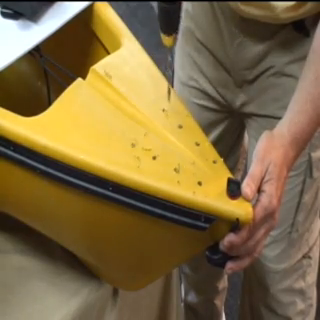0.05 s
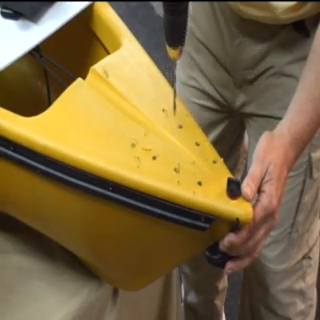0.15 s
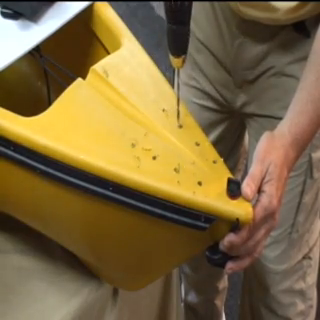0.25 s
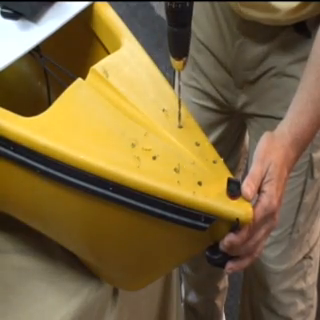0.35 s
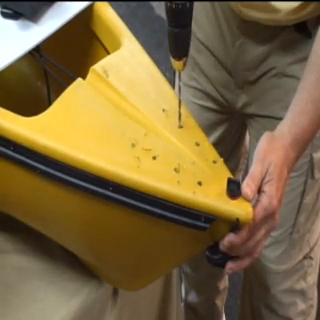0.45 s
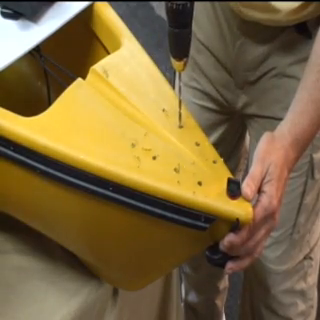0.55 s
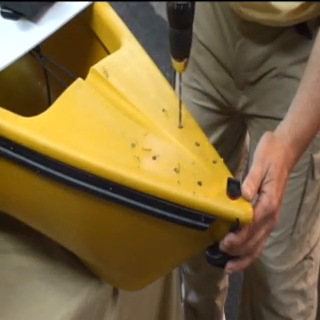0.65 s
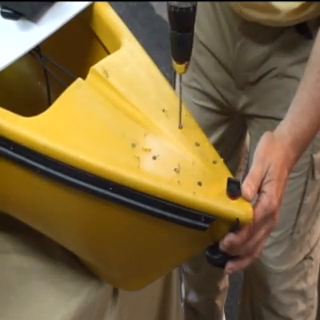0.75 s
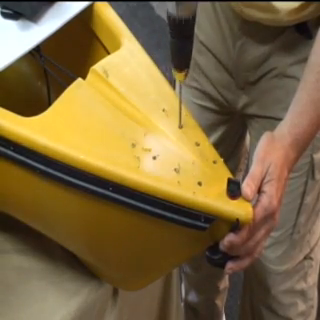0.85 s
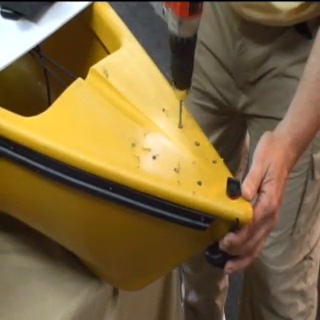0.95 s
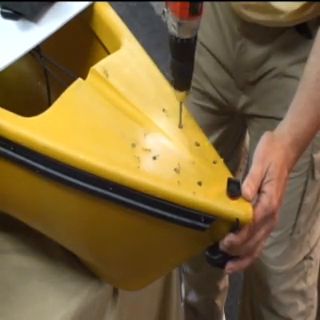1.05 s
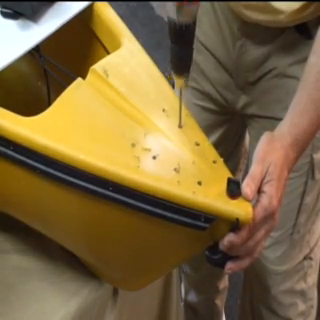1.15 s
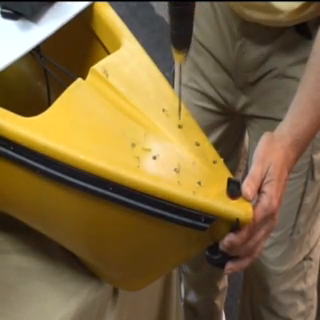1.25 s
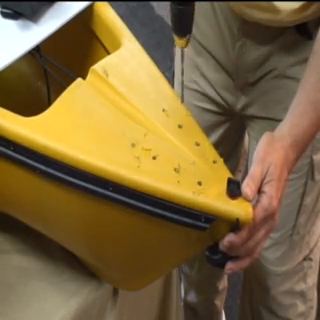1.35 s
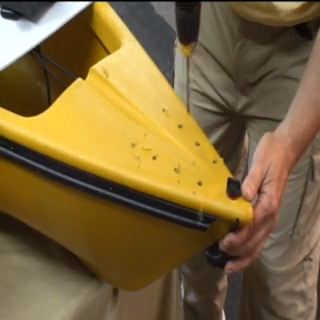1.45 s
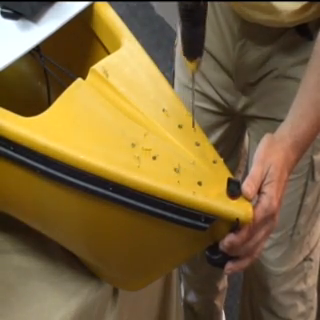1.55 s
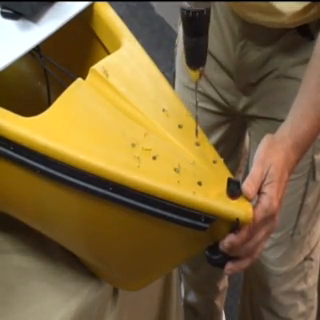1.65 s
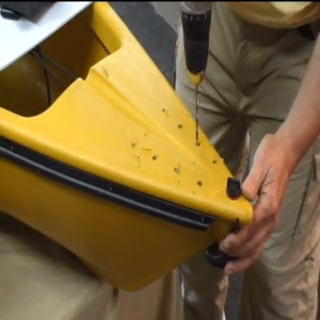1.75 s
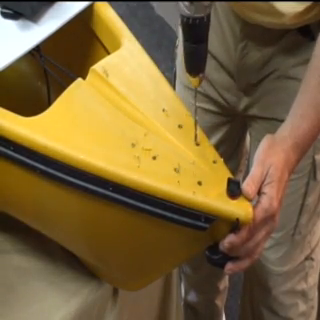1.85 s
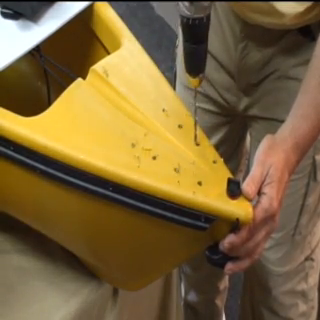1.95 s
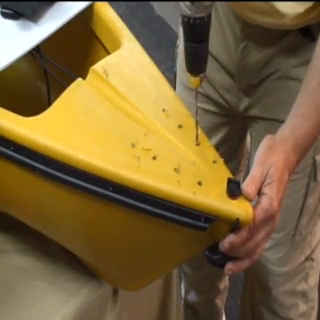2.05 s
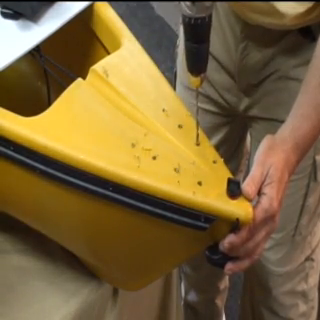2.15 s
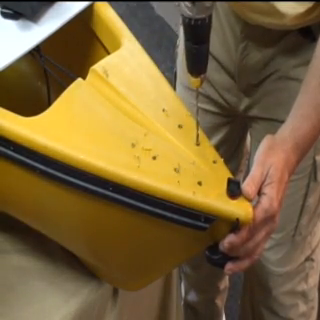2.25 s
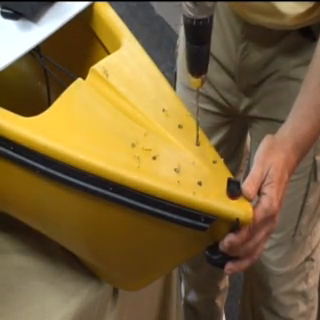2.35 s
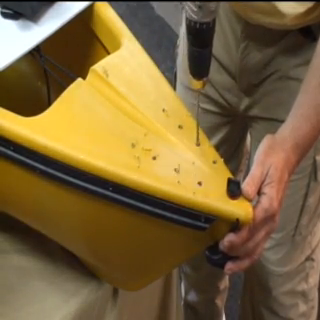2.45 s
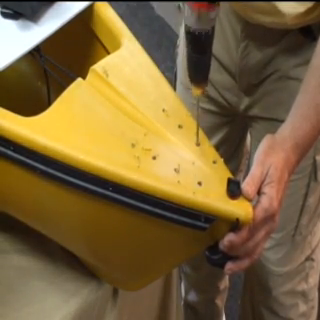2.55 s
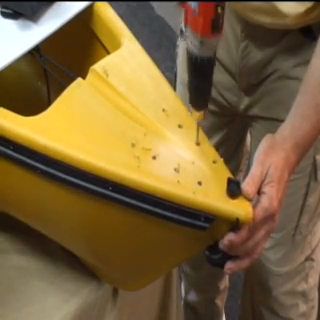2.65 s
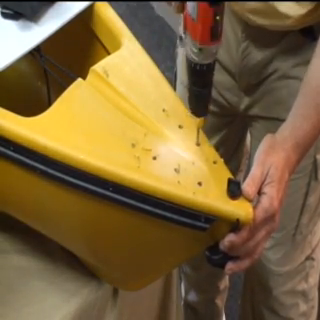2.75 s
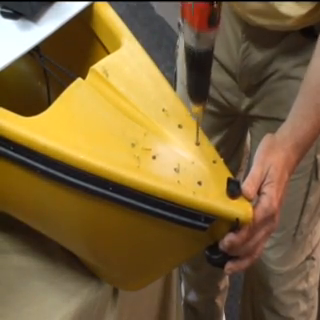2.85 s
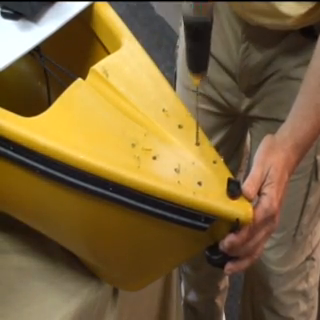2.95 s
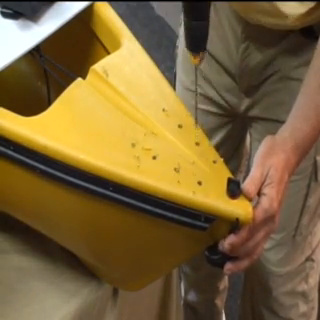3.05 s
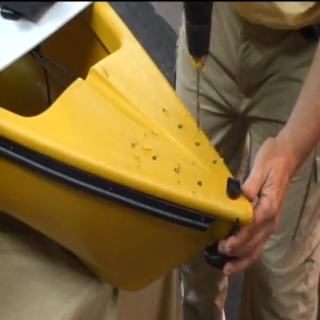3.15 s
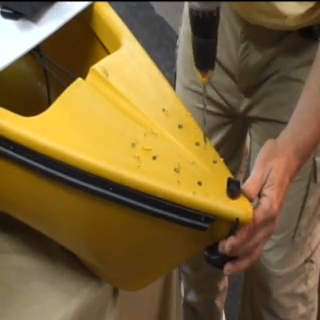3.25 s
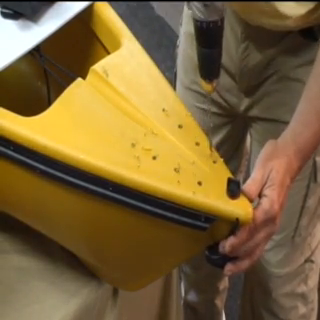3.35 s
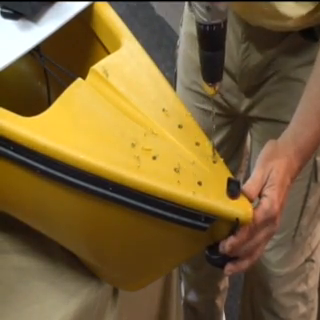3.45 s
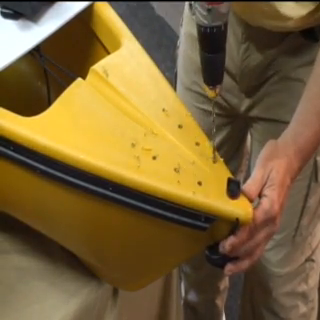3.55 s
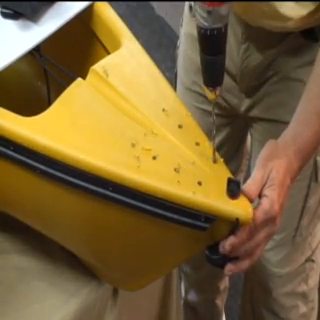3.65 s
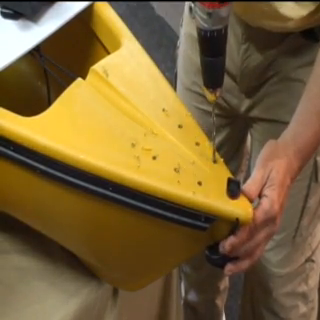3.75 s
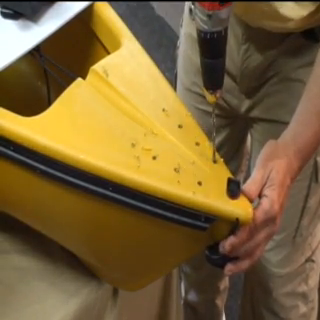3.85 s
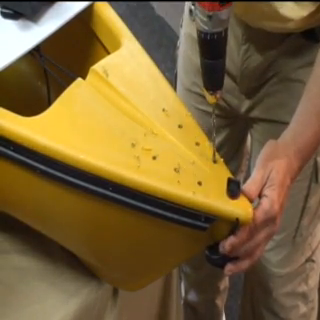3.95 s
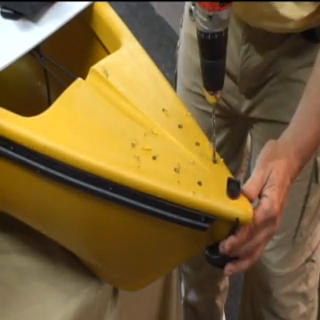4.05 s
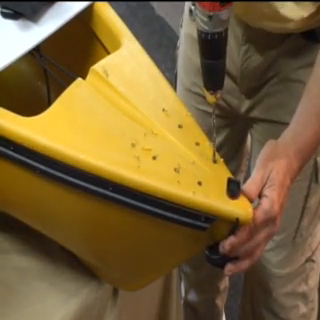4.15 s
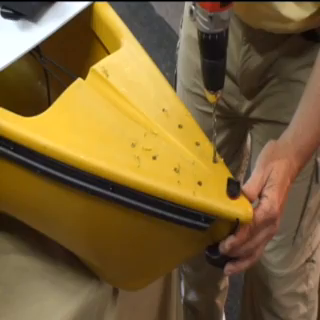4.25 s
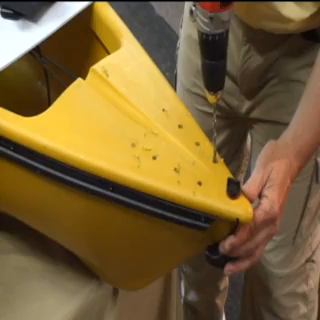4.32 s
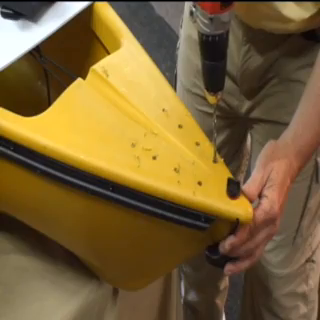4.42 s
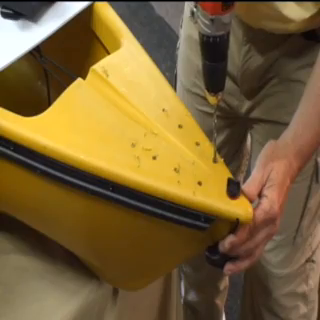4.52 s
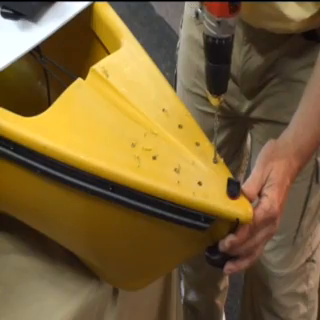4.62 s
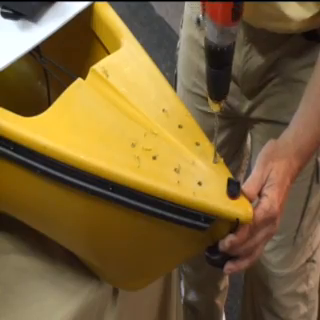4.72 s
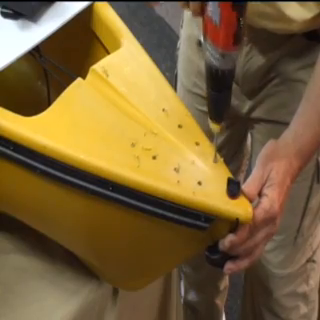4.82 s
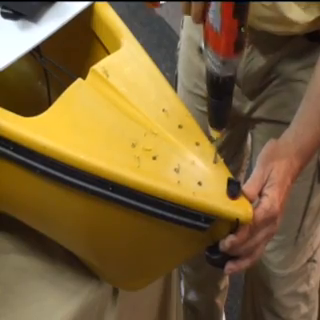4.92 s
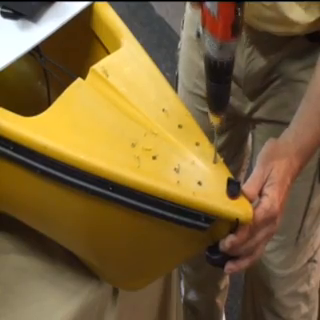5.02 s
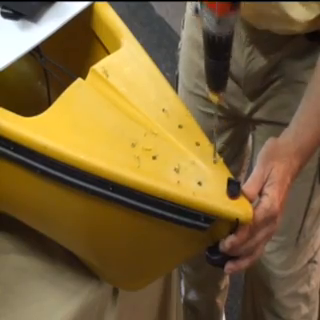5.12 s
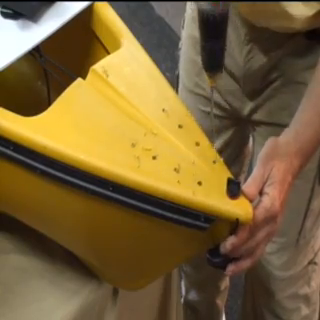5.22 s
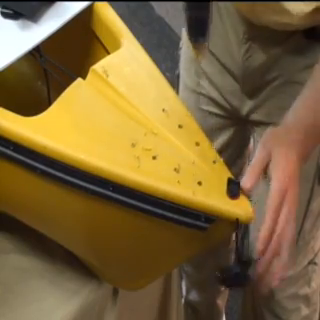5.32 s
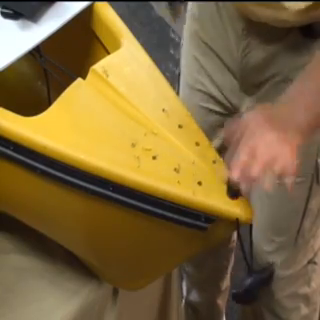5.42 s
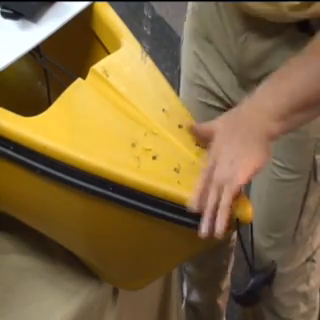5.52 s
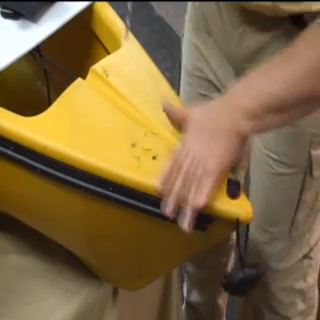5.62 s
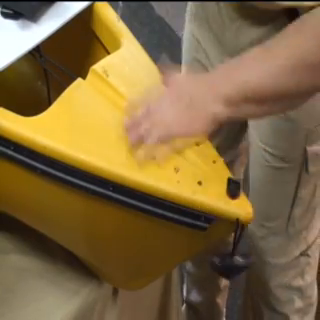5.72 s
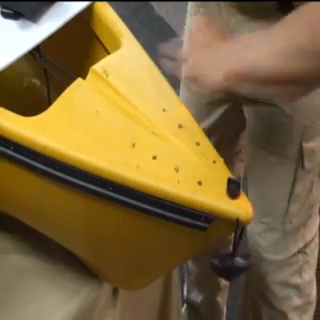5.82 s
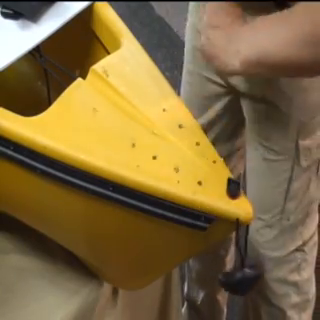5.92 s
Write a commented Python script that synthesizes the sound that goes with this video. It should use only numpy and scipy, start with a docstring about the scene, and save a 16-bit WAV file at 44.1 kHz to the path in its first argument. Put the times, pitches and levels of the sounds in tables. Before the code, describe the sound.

A cordless drill is already whining close to the microphone, its bit drumming into a hollow plastic hull, and it stops with a sharp snap at about 0.3 seconds. Three more pulls follow, from 1.0 to 1.65, from 2.7 to 3.4 and from 4.9 to 5.5 seconds. In each, the motor rises quickly to a steady high whine over a gear rattle, while the shell gives a low rumble under the bit and chips sizzle briefly. Every stop brings a hard clack, a short rattle of the chuck and a faint ring of steel. At about 3.5 seconds the bit pulls out with a short bright scrape. Around 5.8 seconds a hand brushes softly over the plastic. Quiet ventilation and a machine hum fill the pauses, and the workshop adds a short reverberation.

```python
"""A cordless drill, already whining, bores into a hollow plastic hull close to the microphone in a workshop.
In each of four pulls the motor runs up, its fan whines over the gear rattle and the hull drums under the
bit; then the brake snaps, the chuck rattles to rest and the steel bit rings. Last, a hand brushes the deck.
Ventilation and a machine hum lie behind, dipping at each stop; gain control turns the loud passages down."""
import sys
import numpy as np
from scipy import signal
from scipy.fft import rfft, irfft
from scipy.io import wavfile
from scipy.ndimage import uniform_filter1d

SR = 44100
rng = np.random.default_rng(int(sys.argv[2]) if len(sys.argv) > 2 else 0)


def waveform_to_disk(signal):
    """Save audio, clipped to [-1, 1], as 16-bit WAV at the path in sys.argv[1]."""
    frames = np.transpose(np.atleast_2d(signal))
    scaled = np.clip(frames, -1, 1) * 32767
    samples = np.round(scaled).astype(np.int16)
    wavfile.write(sys.argv[1], SR, samples)


N = 263718
TIME = np.arange(N) / SR
BINS = np.fft.rfftfreq(N, 1 / SR)

# trigger pulls, the first already under way:
# start_s, brake_s, top_speed_hz, whine_db, snap_db, rebound_count, rebound_gap_s, rebound_loss_db
PULLS = [(-0.45, 0.2766, 382, -1.5, 4.5, 2, 0.0168, 4), (0.986, 1.651, 380, -2.5, 3, 2, 0.019, 7.5),
         (2.68, 3.382, 378.5, -1.5, 3, 1, 0.0175, 10.5), (4.878, 5.5372, 378.4, -4.5, 3.5, 3, 0.0183, 3)]


def motor(drive_db=-12.0, growth=1.4, fan_growth=0.4):
    """Motor speed sets the pitch and loudness of the drive; returns the whine and the gear noise."""
    # clean tones of fan and commutator: speed_multiple, level_db
    tones = [(1, -23), (15, -8.5), (17, -30), (18, -24.5), (20, -58), (21, -41), (22, -27), (30, -36)]
    # how well the casing and its vent slots radiate them: frequency_hz, gain_db
    vents = [(300, -31), (360, -11), (378, 3.5), (700, -1), (3000, -15), (3800, 4), (4250, 7.5),
             (4700, 5.5), (5100, 0), (5700, 2.5), (12000, 16)]
    runs = [spin(*pull[:3]) for pull in PULLS]
    steady = sum(runs)
    share = steady / steady.max()
    unevenness = .0018 + .025 * (1 - share)  # the shaft runs unevenly until it is up to speed
    speed = steady * (1 + unevenness * drift(hz=140))
    turns = np.cumsum(speed) / SR
    whine = np.zeros(N)
    for multiple, db in tones:
        flutter_db = 2.2 * drift(hz=25) + 1.8 * drift(hz=130)
        level = amp(db + read(vents, multiple * steady) + flutter_db)
        whine += level * np.sqrt(2) * np.sin(2 * np.pi * multiple * turns)
    pull_gain = sum((run > 0) * amp(pull[3]) for run, pull in zip(runs, PULLS))
    drive = amp(drive_db) * share ** growth
    gear_noise = gears(speed, turns) + strain(speed, rising=np.gradient(steady) > 0)
    return drive * share ** fan_growth * whine * pull_gain, drive * gear_noise


def spin(start, stop, top_hz, surge_s=.04, creep_s=.1186, creep_share=.38, let_go_s=.02, stall_s=.04):
    """Motor speed in one pull: a quick surge, a slow creep, a stall as the trigger is let go."""
    t = np.maximum(TIME - start, 0)
    wound = 1 - (1 - creep_share) * np.exp(-t / surge_s) - creep_share * np.exp(-t / creep_s)
    braked = np.clip((TIME - stop + let_go_s) / stall_s, 0, 1)
    return top_hz * wound * (1 - braked ** 2)


def gears(speed, turns, rattle_db=-2.03, wander_db=0.65, dull_hz=1500, brightening=0.76):
    """Tooth impacts ring the casing; they swell with each turn of the planet carrier and the planets."""
    # gear rattle as the casing radiates it: frequency_hz, level_db
    casing = [(59, -43), (100, -7), (188, -15.5), (274, -6), (330, -11.5), (482, -11), (1370, -2.5),
              (1660, -10), (3250, -1), (4840, -4), (5480, -9.5), (5960, -6), (11200, -13), (13800, -20),
              (15000, -59)]
    # casing resonances: centre_hz, width_hz, lift_db
    casing_modes = [(820, 43, 4.5), (963, 59, 3), (1115, 30, 5.5), (1210, 21, -5), (1405, 53, 3.5),
                    (1794, 250, 6), (2000, 71, 3), (3100, 37, 1.5), (3272, 74, -1.5), (3440, 34, -2.5),
                    (5200, 41, 0.5), (8680, 120, 9)]
    # unsteady gear-mesh tones: speed_multiple, width_hz, level_db
    mesh_tones = [(2.795, 81, -24.5), (3.51, 120, -19.5), (8.7, 33, -17), (10.1, 19, -41),
                  (11.05, 270, -30), (19.6, 110, -34), (21.43, 120, -28)]
    carrier, planets = 2 * np.pi * .14 * turns, 2 * np.pi * .795 * turns
    load = 1 + .1 * np.cos(carrier) + .18 * np.cos(planets) + .15 * np.cos(2 * planets)
    lift_db = sum(db / (1 + (2 * (BINS - hz) / width) ** 2) for hz, width, db in casing_modes)
    impacts = grains(per_s=20000, spread_db=1.0) * load * amp(wander_db * drift(hz=23.5))
    rattle = unit(colour(impacts, read(casing, BINS) + lift_db))
    dull = colour(rattle, -10 * np.log10(1 + (BINS / dull_hz) ** 4))
    rattle = dull + (rattle - dull) * (abs(speed) / speed.max()) ** brightening  # slow teeth hit softly
    mesh = sum(amp(db) * noise_band(multiple * speed, width) for multiple, width, db in mesh_tones)
    return amp(rattle_db) * rattle + mesh


def strain(speed, rising, span_hz=24, width_hz=70):
    """Each loaded gear pair sings briefly as the speed sweeps up through its range."""
    # gears under torque: speed_multiple, loudest_speed_hz, level_db
    gear_pairs = [(4.5, 140, -7), (5, 190, -8), (9.33, 334, -10.5), (11.05, 345, -14.5), (19.33, 327, -13)]
    out = np.zeros(N)
    for multiple, loudest_hz, db in gear_pairs:
        swell = rising * np.exp(-((speed - loudest_hz) / span_hz) ** 2 / 2)
        out += amp(db) * swell * noise_band(multiple * speed, width_hz)
    return out


def trigger(level_db=-39, pitch_hz=5600, rise_hz=500, width_hz=450, lead_s=0.01, length_s=0.032):
    """A brief, fuzzy rising squeal as current first reaches the motor."""
    swell, climb = np.zeros(N), np.zeros(N)
    for start, *_ in PULLS:
        add(swell, start - lead_s, amp(level_db) * np.hanning(int(length_s * SR)))
        add(climb, start - lead_s, np.linspace(0, rise_hz, int(length_s * SR)))
    return swell * noise_band(pitch_hz + climb, width_hz)


def boring():
    """The bit bites ever harder into the hull until it slips or breaks through; once it scrapes out."""
    # bites of the bit: start_s, end_s, final_db
    bites = [(-0.02, 0.195, -19.5), (1.169, 1.197, -23.5), (1.427, 1.548, -21.5), (2.82, 3.224, -29.5),
             (4.955, 5.464, -32.5)]
    # chips sizzling, and a short bright scrape as the bit pulls out of the hole:
    # start_s, length_s, level_db
    chips_and_scrape = [(1.26, 0.11, -19), (3.16, 0.061, -21), (3.454, 0.0086, -13.5), (3.46, 0.028, -19.5),
                        (5.06, 0.13, -20), (5.18, 0.14, -24)]
    force = sum(amp(db) * press(start, end, attack_s=0.01, growth_db=9.5, release_s=0.013)
                for start, end, db in bites)
    return hull(force) + hisses(chips_and_scrape, hz=10600, width_hz=11400)


def hull(force):
    """The cutting edges, or a palm, snatch at the plastic and drum the hollow shell."""
    # modes of the shell: pitch_hz, half_width_hz, level_db
    shell_modes = [(153, 18, -6), (219, 25.6, -3), (252, 26, -4.5), (274.2, 26, -1)]
    snatch = grains(per_s=1100, spread_db=-5.0)
    drumming = sum(amp(db) * unit(resonate(snatch, hz, 2 * half)) for hz, half, db in shell_modes)
    return force * unit(drumming)


def brake(gain_db=-3.5, slack_s=.006):
    """The spindle lock takes up slack at each start; at each stop it snaps shut and rebounds."""
    out = np.zeros(N)
    for start, stop, _, _, snap_db, rebounds, gap_s, loss_db in PULLS:
        add(out, start + slack_s, clack(-25.5, tilt_db_per_octave=-3, rise_s=.005))
        for k in range(1 + round(rebounds)):  # each rebound is weaker and thinner
            snap = clack(snap_db - k * loss_db, tilt_db_per_octave=-1 + 2 * k, rise_s=0.00054 * (1 + k))
            add(out, stop + k * gap_s, snap)
    return amp(gain_db) * out


def clack(db, tilt_db_per_octave, rise_s):
    """A crack and a short shudder of the casing; glancing ones swell more slowly."""
    # spectrum of a clack: frequency_hz, level_db
    clack_colour = [(200, -70), (600, -5), (1100, -2), (2800, 2.5), (5000, -3), (9000, -9), (14000, -10.5)]
    # its decay: crack_s, shudder_s, shudder_db
    clack_decay = (.0016, .016, -15)
    crack_s, shudder_s, shudder_db = clack_decay
    t = np.arange(4096) / SR
    hz = np.fft.rfftfreq(len(t), 1 / SR)
    after = np.maximum(t - rise_s, 0)
    decay = np.exp(-after / (crack_s + rise_s / 2)) + amp(shudder_db) * np.exp(-after / shudder_s)
    spectrum_db = read(clack_colour, hz) + tilt_db_per_octave * np.log2((hz + 1) / 3000)
    burst = unit(colour(rng.standard_normal(len(t)), spectrum_db))
    return amp(db) * np.minimum(t / rise_s, 1) * decay * burst


def run_down(level_db=-25.5):
    """The unloaded gears tick over as the chuck coasts."""
    # spectrum of the ticking: frequency_hz, level_db
    tick_colour = [(200, -25), (800, 1), (3000, -2), (6000, 0), (10000, 4), (14000, -21)]
    ticks = unit(colour(grains(per_s=2000, spread_db=1.0), read(tick_colour, BINS)))
    return amp(level_db) * coasting(fade_db_per_s=130) * ticks


def chuck(rise_s=.03, hold_s=.095, jingle_db=-37):
    """The steel bit rings on after each stop while the jaws jingle."""
    # modes of the bit: pitch_hz, level_db, t60_s
    steel_modes = [(3940, 7.5, 0.58), (6900, -15, 0.45), (8700, 6, 0.3), (9884, 7, 0.26), (11270, 16, 0.35)]
    # rings as the chuck settles: start_s, level_db, tilt_db_per_octave
    pings = [(0.4, -50.5, -9), (1.74, -48.5, -9), (3.48, -40.5, -12), (5.6, -50.5, -8)]
    out, t = np.zeros(N), np.arange(SR) / SR
    for start, db, tilt in pings:
        for hz, mode_db, t60 in steel_modes:
            level = amp(db + mode_db + tilt * np.log2(hz / steel_modes[0][0]))
            envelope = np.minimum(t / rise_s, 1) * amp(-60 * np.maximum(t - hold_s, 0) / t60)
            add(out, start, level * envelope * np.sin(2 * np.pi * hz * t))
    jaws = unit(resonate(grains(per_s=2000, spread_db=-1.5), hz=8620, width_hz=220))
    return out + amp(jingle_db) * coasting(fade_db_per_s=47) * jaws


def coasting(fade_db_per_s, coast_s=0.21):
    """Envelope of the chuck coasting after each brake, ever fainter until it stands."""
    fade_db = fade_db_per_s * coast_s
    coasts = sum(press(stop, stop + coast_s, attack_s=.04, growth_db=-fade_db, release_s=0.015)
                 for _, stop, *_ in PULLS)
    return amp(-fade_db) * coasts


def handling(skin_db=-34, palm_db=-42):
    """A hand drags over plastic and chips with growing pressure; the bit tip scuffs the deck."""
    # skin on the deck: frequency_hz, level_db
    brush_colour = [(240, -34), (400, -12), (451, -29), (607, -7), (1070, -12.5), (7720, -15), (8700, -9.5),
                    (14000, -25)]
    # faint scuffs as the bit is placed: start_s, length_s, level_db
    scuffs = [(2.335, 0.02, -52), (2.52, .02, -61), (4.617, 0.028, -56)]
    sweep = press(5.76, 5.98, attack_s=0.054, growth_db=8.5, release_s=0.054)
    skin = unit(colour(grains(per_s=7200, spread_db=2.8), read(brush_colour, BINS)))
    brush = amp(skin_db) * sweep * skin + hull(amp(palm_db) * sweep)
    return brush + hisses(scuffs, hz=9800, width_hz=4000)


def hisses(rows, hz, width_hz):
    """Short swells of bright friction noise."""
    swell = np.zeros(N)
    for start, length_s, db in rows:
        add(swell, start, amp(db) * np.hanning(int(length_s * SR)))
    friction = grains(per_s=12000, spread_db=1.5)
    return swell * unit(resonate(friction, hz, width_hz))


def room(x):
    """Sparse workshop reflections, each band dying at its own rate, the bass shared by both channels."""
    # reverberation time: frequency_hz, t60_s
    decay_times = [(200, 0.59), (1000, 0.39), (4000, 0.42), (9000, 0.28), (14000, 0.23)]
    # stereo width of the reflections: frequency_hz, side_minus_mid_db
    stereo_width = [(100, -26), (500, -11), (1300, -10), (2200, -2), (4000, -2), (5400, 1), (8500, -6),
                    (11000, -4), (12600, -15)]
    taps = rng.choice([-1., 1.], (2, SR)) * (rng.random((2, SR)) < .07) * (TIME[:SR] > .004)
    hz, t, spectra = signal.stft(taps, SR, nperseg=256)
    mid, side = spectra * amp(-60 * t / read(decay_times, hz)[:, None])
    width = amp(read(stereo_width, hz))[:, None]
    left_right = np.array([mid + width * side, mid - width * side]) / np.hypot(1, width)
    tail = signal.istft(left_right, SR, nperseg=256)[1]
    return signal.fftconvolve(x[None], tail / np.linalg.norm(tail[0]), axes=1)[:, :N]


def workshop(air_db=-36.5, side_db=-25, side_tilt_db=3, hiss_db=-68):
    """Room tone: a low, nearly mono roar of ventilation, a wavering hum and a thin high hiss."""
    # ventilation: frequency_hz, level_db
    air_colour = [(15, -51), (25, -17.5), (85, -8), (119, -4.5), (219, -3.5), (318, -10), (599, -13.5),
                  (802, -18), (868, -13.5), (940, -19), (1190, -21.5), (4140, -36.5), (10700, -41.5),
                  (12600, -51), (14000, -87)]
    # a machine humming in the workshop: pitch_hz, level_db
    hum_tones = [(118.6, -44), (597.5, -57), (893.6, -58)]
    spectrum_db = read(air_colour, BINS)
    mid = colour(rng.standard_normal(N), spectrum_db)
    side = colour(rng.standard_normal(N), spectrum_db + side_tilt_db * np.log2(BINS / 200 + 1))
    air = unit(mid + amp(side_db) * side * np.array([[1], [-1]])) * amp(.6 * drift(hz=9))
    hum = np.zeros(N)
    for hz, db in hum_tones:
        level = amp(db + 1.8 * drift(hz=5))
        hum += level * np.sqrt(2) * np.sin(2 * np.pi * hz * TIME + .4 * drift(hz=4))
    return amp(air_db) * air + hum + amp(hiss_db) * noise_band(hz=10750, width_hz=350)


def dip(depth_db=-10.5, lead_s=0.019, hold_s=0.065):
    """Gain curve of the room tone: it dips briefly around each stop."""
    dips = sum(press(stop - lead_s, stop + hold_s, attack_s=lead_s, growth_db=0, release_s=.04)
               for _, stop, *_ in PULLS)
    return amp(depth_db * dips)


def press(start, end, attack_s, growth_db, release_s):
    """Envelope of a push: an attack, a steady slope in dB to gain 1 at its end, then release."""
    attack = np.clip((TIME - start) / attack_s, 0, 1)
    progress = np.clip((TIME - start) / (end - start), 0, 1)
    release = np.exp(-np.maximum(TIME - end, 0) / release_s)
    return attack * amp(growth_db * (progress - 1)) * release


def grains(per_s, spread_db):
    """Random tiny impacts of uneven size."""
    sizes = rng.standard_normal(N) * amp(spread_db * np.minimum(rng.exponential(1, N), 4))
    return unit(sizes * (rng.random(N) < per_s / SR))


def resonate(x, hz, width_hz):
    """A steep resonance whose pitch may glide."""
    turn = np.exp(2j * np.pi * np.cumsum(hz * np.ones(N)) / SR)
    pole = np.exp(-np.pi * width_hz / SR)
    return (turn * signal.lfilter([(1 - pole) ** 2], [1, -2 * pole, pole * pole], x / turn)).real


def noise_band(hz, width_hz):
    """Noise of rms 1 around a pitch."""
    return unit(resonate(rng.standard_normal(N), hz, width_hz))


def drift(hz):
    """Random wander of rms 1, up to about the given rate."""
    return unit(irfft(rfft(rng.standard_normal(N)) / (1 + (BINS / hz) ** 4), N))


def colour(x, db):
    """Filters by a gain in dB for each frequency."""
    return irfft(rfft(x) * amp(db), x.shape[-1])


def read(points, hz):
    """Reads a table on a log-frequency axis."""
    table_hz, values = np.transpose(points)
    return np.interp(np.log(hz + 1), np.log(table_hz + 1), values)


def add(mix, start_s, sound):
    """Adds a sound at a time; whatever lies outside the mix is dropped."""
    at = round(start_s * SR)
    sound = sound[max(-at, 0):]
    part = mix[max(at, 0):][:len(sound)]
    part += sound[:len(part)]


def amp(db):
    """Decibels to gain."""
    return 10 ** (np.asarray(db) / 20)


def unit(x):
    """Scales to rms 1."""
    return x / np.sqrt(np.mean(x ** 2) + 1e-20)


def scene(wet_db=-7.5, beamed_send_db=-8):
    """Drill and hull near the microphone; whine and ringing steel arrive drier than the rattle."""
    # the drill sits a little off centre: frequency_hz, left_minus_right_db
    balance = [(60, 0), (2000, -.2), (3200, -1.7), (4400, -2.1), (5400, -3.7), (7000, -2), (10700, -2.2),
               (12200, -.2)]
    whine, rattle = motor()
    diffuse = rattle + trigger() + boring() + brake() + run_down() + handling()
    beamed = whine + chuck()
    heard = diffuse + beamed + amp(wet_db) * room(diffuse + amp(beamed_send_db) * beamed)
    placed = colour(heard, read(balance, BINS) * np.array([[.5], [-.5]]))
    return placed + workshop() * dip()


def record(dry, threshold_db=-17, squeeze=0.53, recovery_db_per_s=17.5, ceiling=.97, edge_hz=14600):
    """Gain control turns loud passages down and recovers slowly; soft overload and a low-pass follow."""
    power_db = 10 * np.log10(abs(uniform_filter1d((dry ** 2).mean(0), size=400)) + 1e-12)
    fall_db = TIME * recovery_db_per_s
    held_db = np.maximum.accumulate(power_db + fall_db) - fall_db
    over_db = np.maximum(held_db - threshold_db, 0)
    cut_db = squeeze * uniform_filter1d(over_db, size=200)
    rounded = ceiling * np.tanh(dry / amp(cut_db) / ceiling)
    low_pass = signal.firwin(255, edge_hz, window=("kaiser", 9), fs=SR)
    return signal.oaconvolve(rounded, low_pass[None], "same")


dry = scene()
out = record(dry)
waveform_to_disk(out)
```